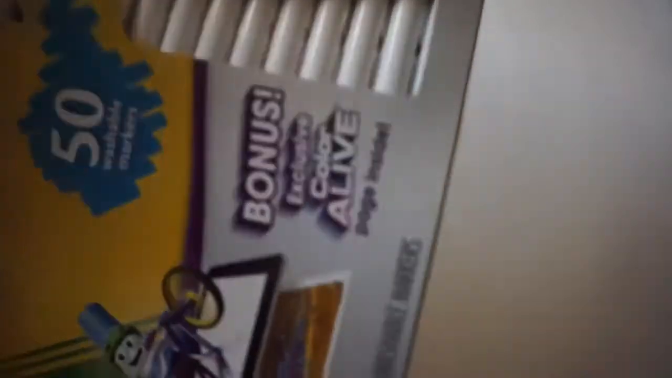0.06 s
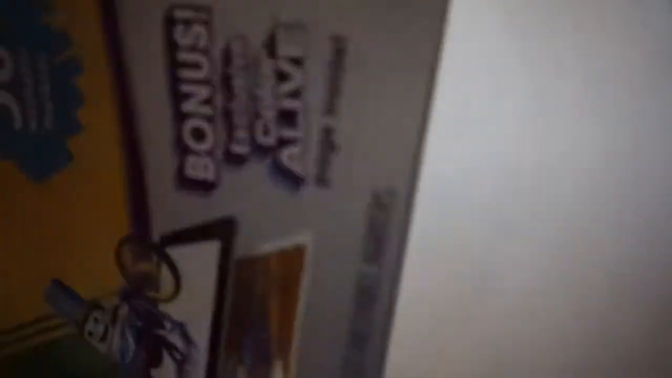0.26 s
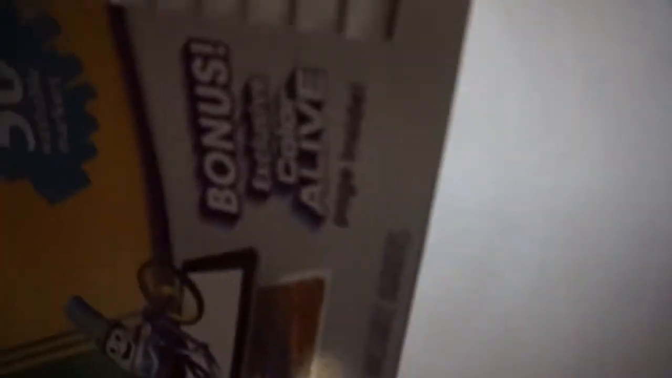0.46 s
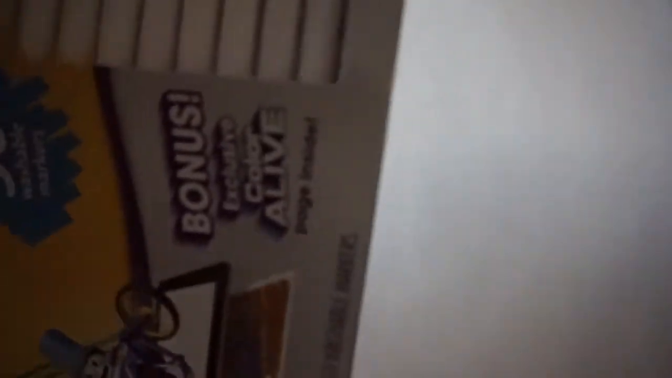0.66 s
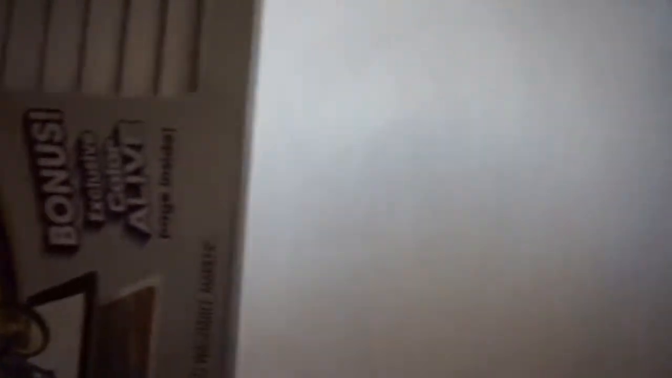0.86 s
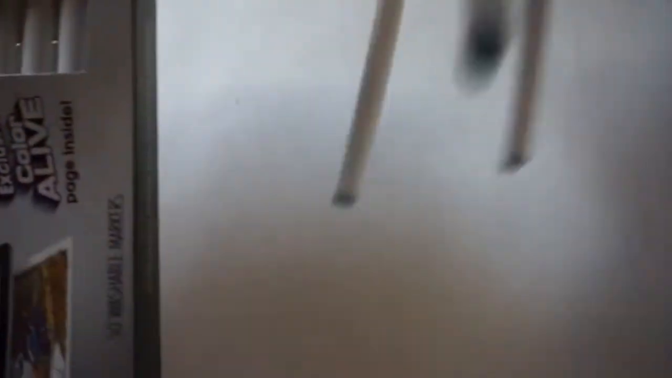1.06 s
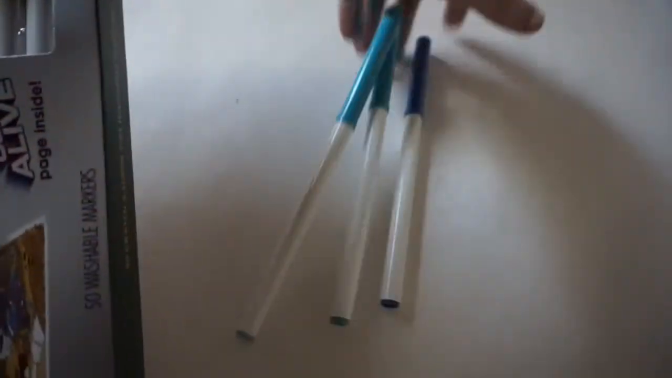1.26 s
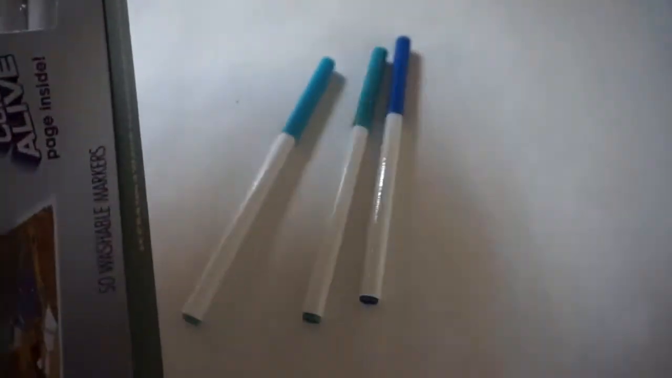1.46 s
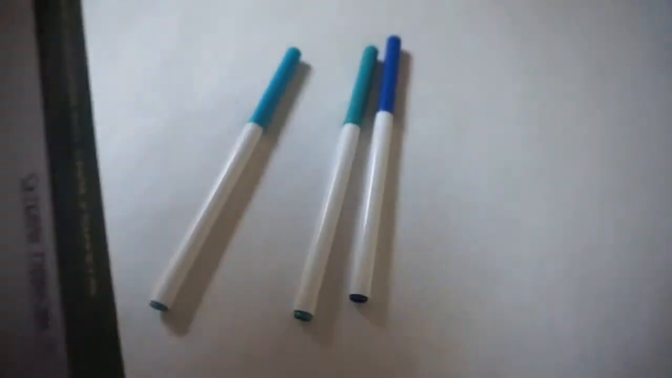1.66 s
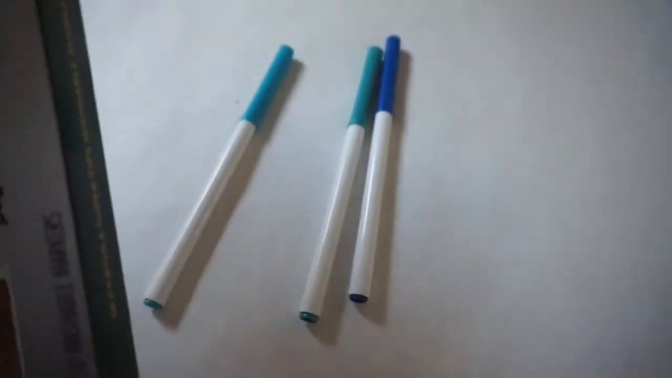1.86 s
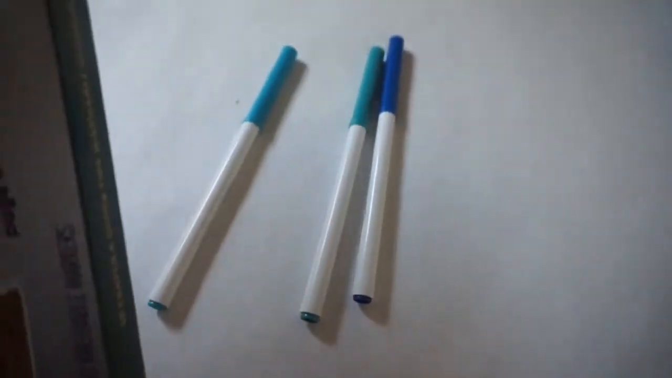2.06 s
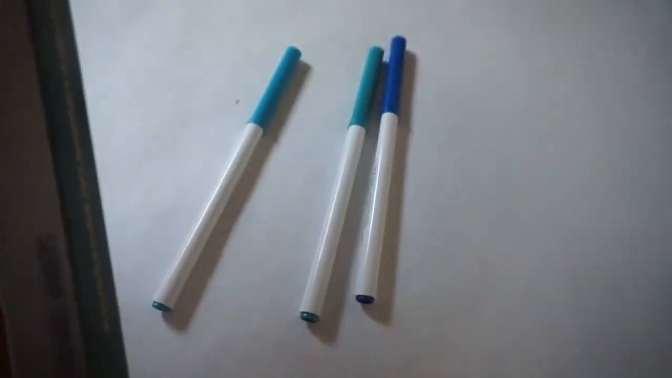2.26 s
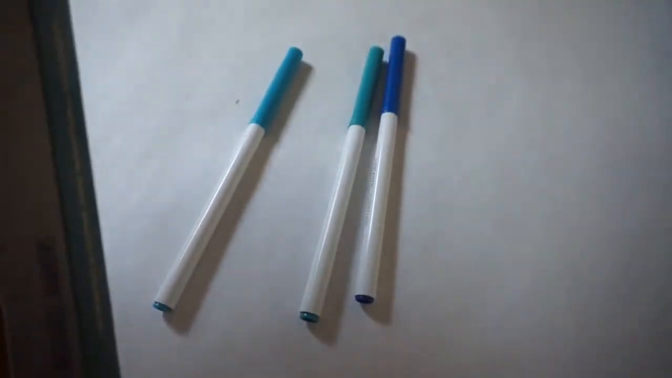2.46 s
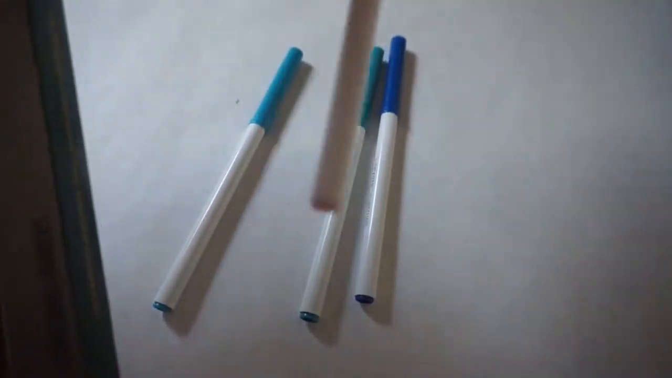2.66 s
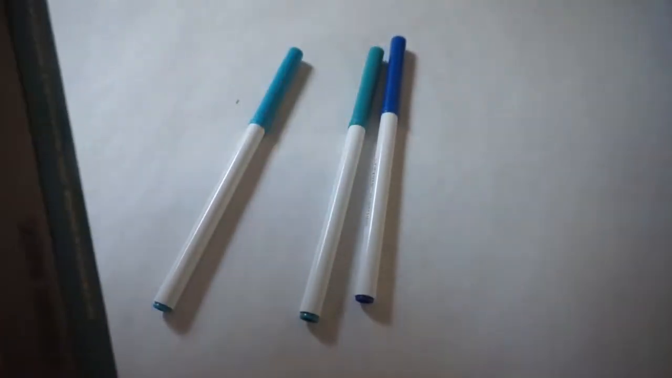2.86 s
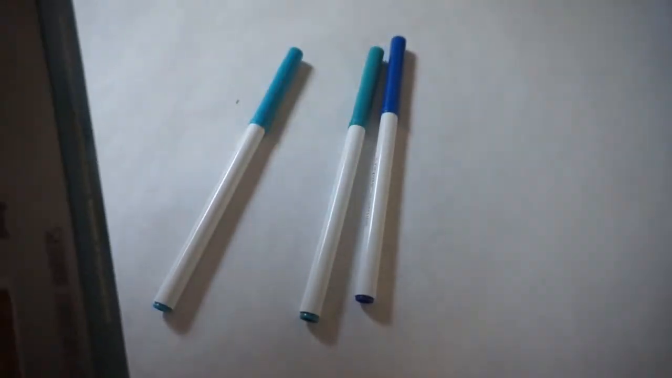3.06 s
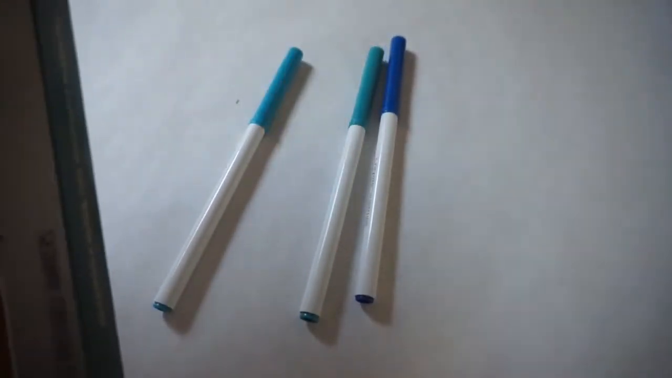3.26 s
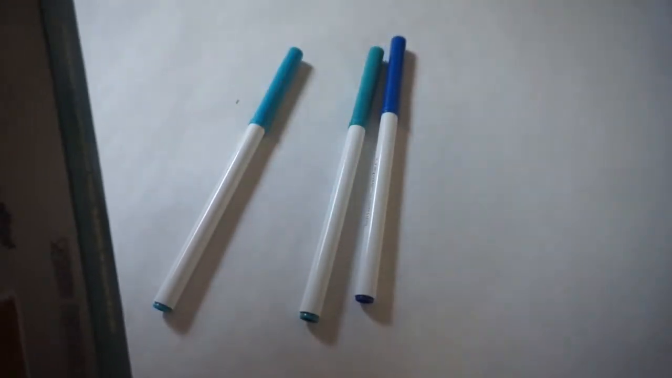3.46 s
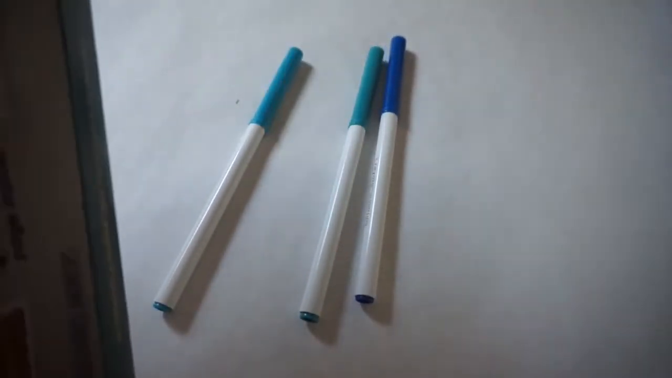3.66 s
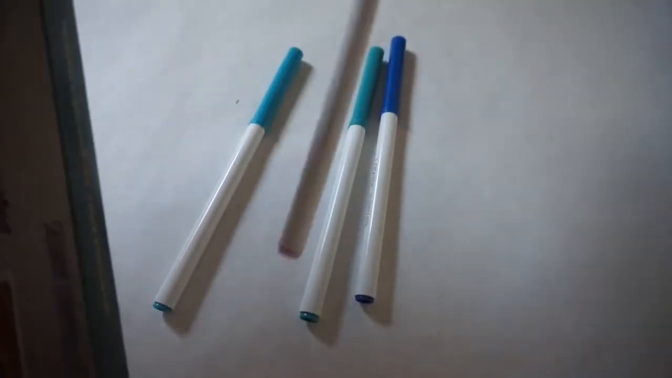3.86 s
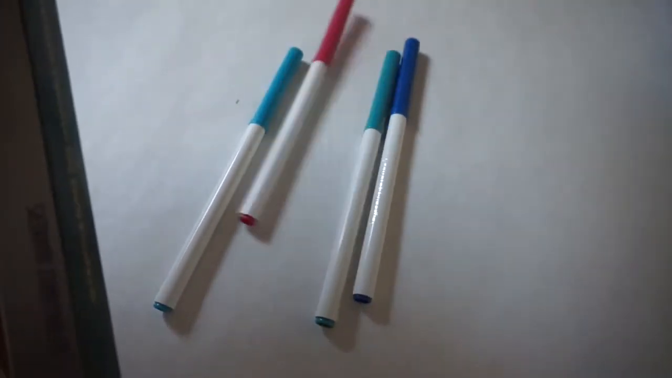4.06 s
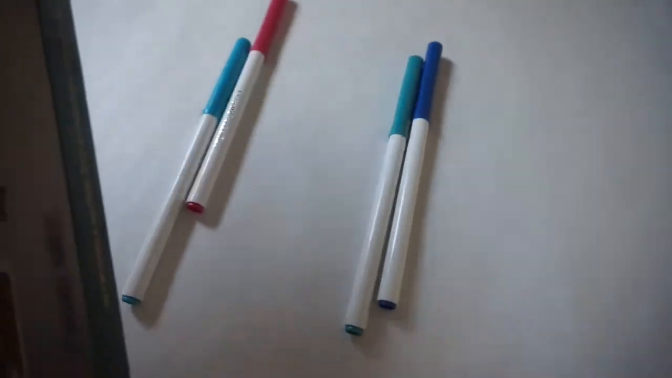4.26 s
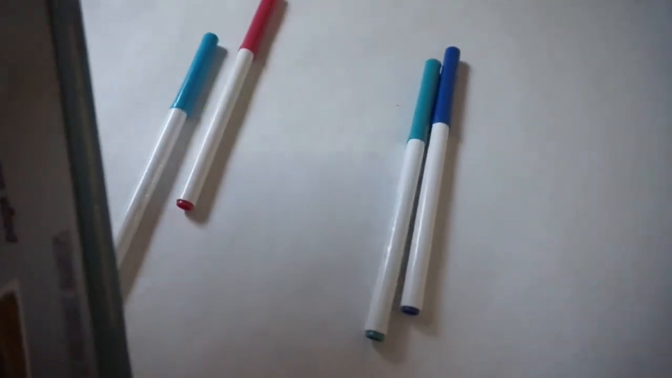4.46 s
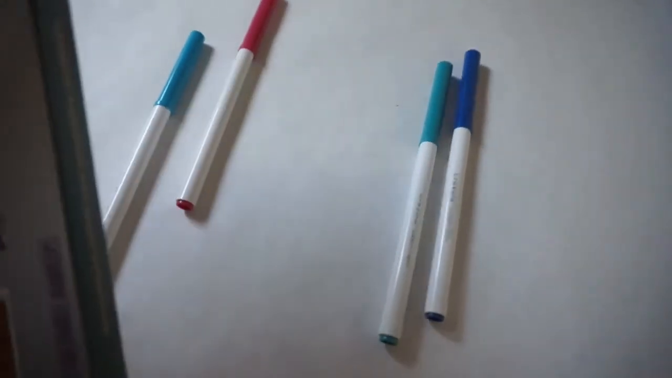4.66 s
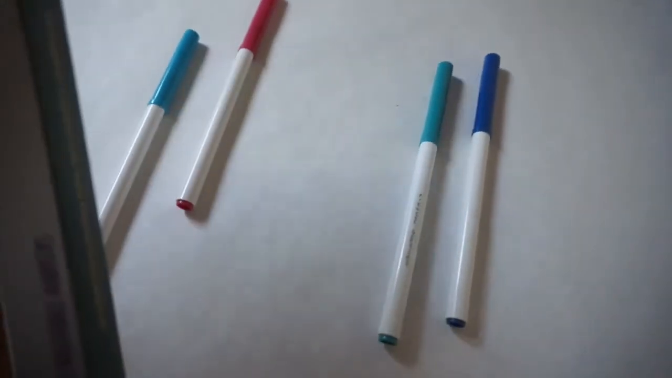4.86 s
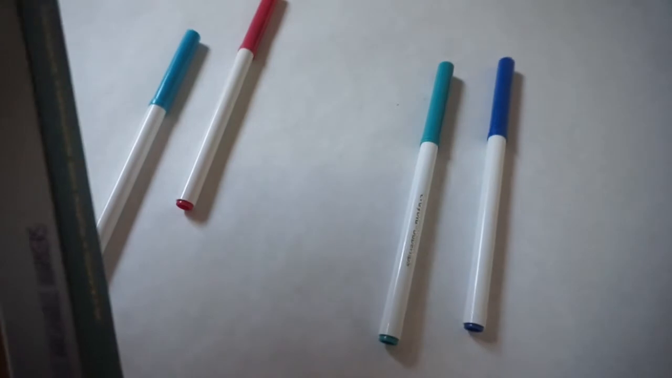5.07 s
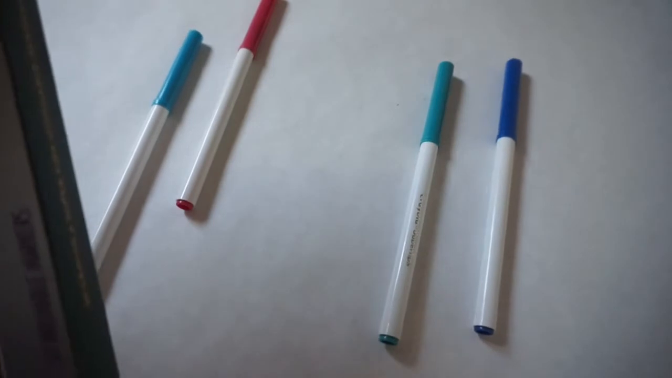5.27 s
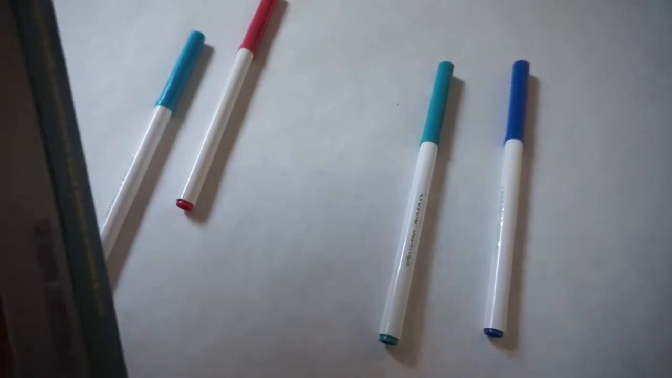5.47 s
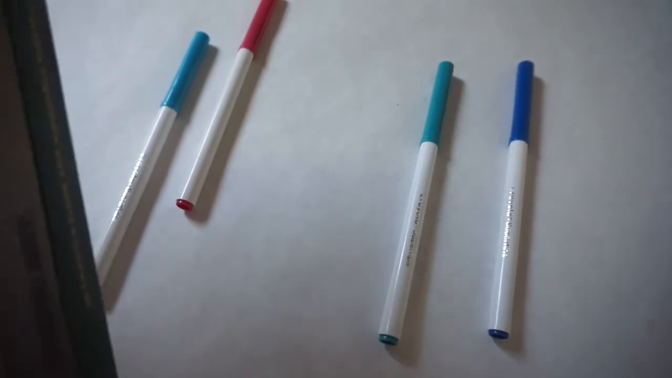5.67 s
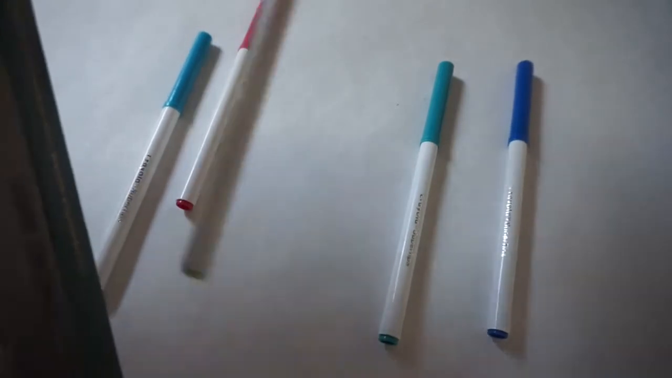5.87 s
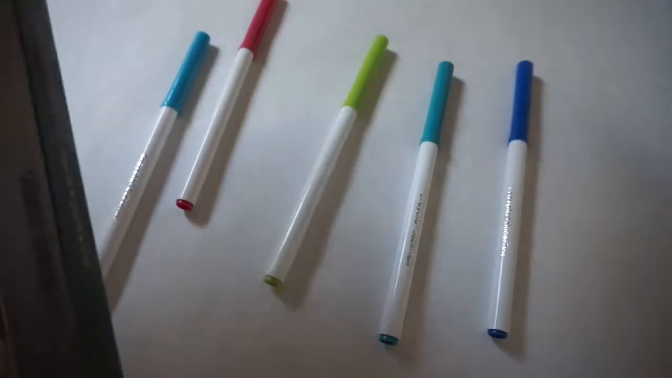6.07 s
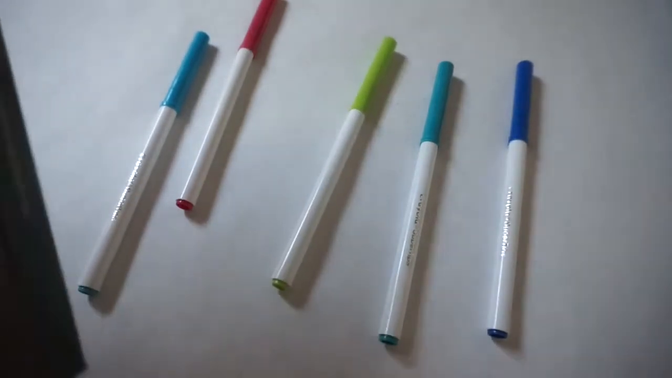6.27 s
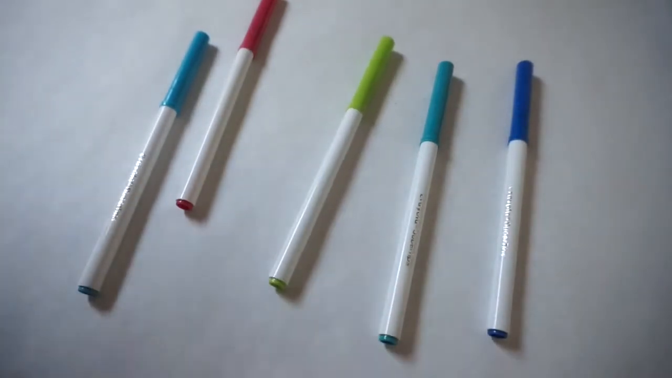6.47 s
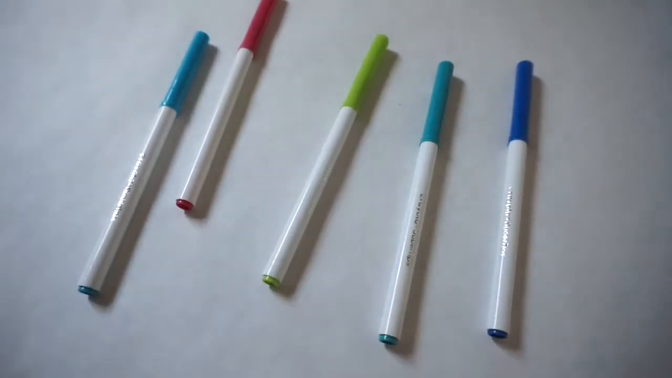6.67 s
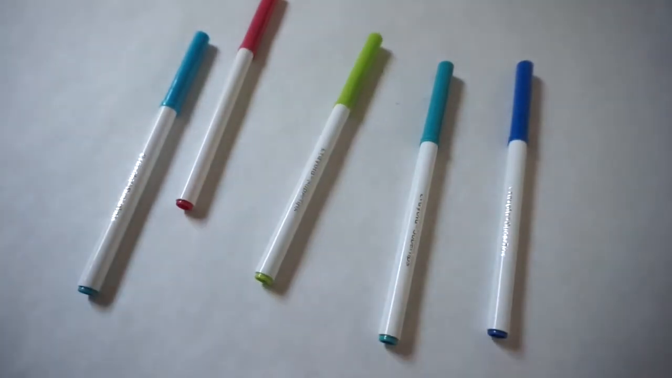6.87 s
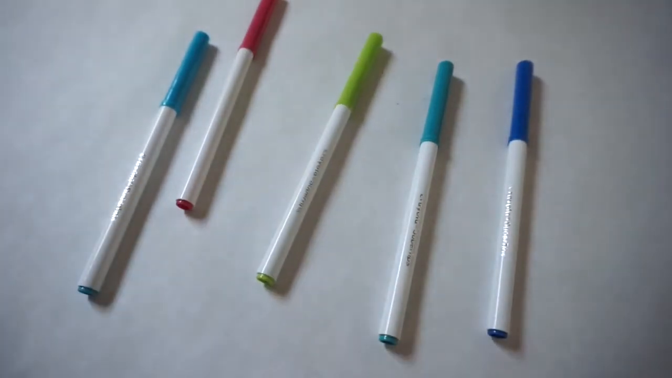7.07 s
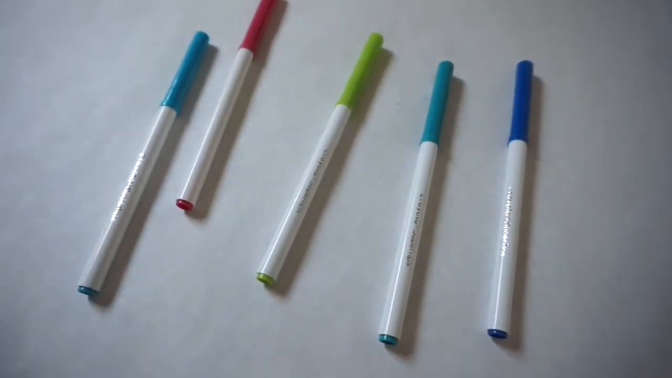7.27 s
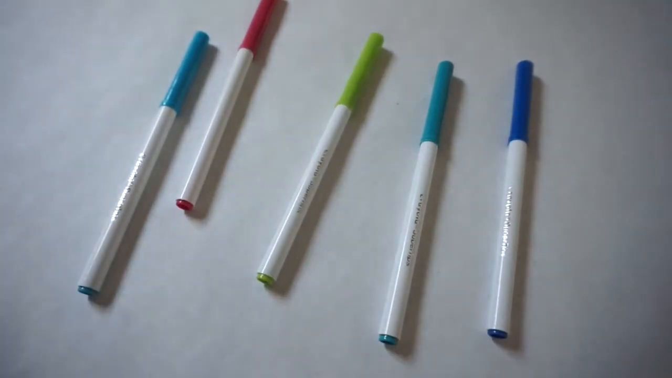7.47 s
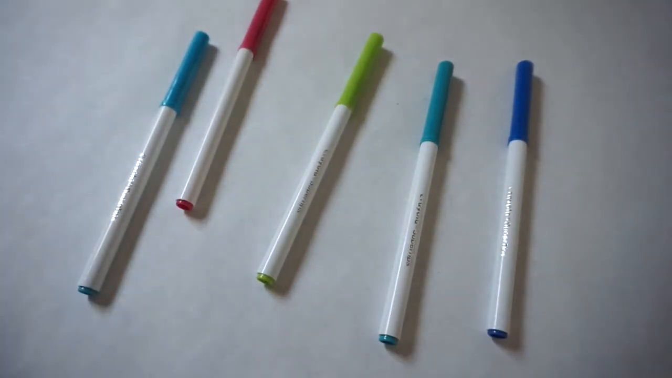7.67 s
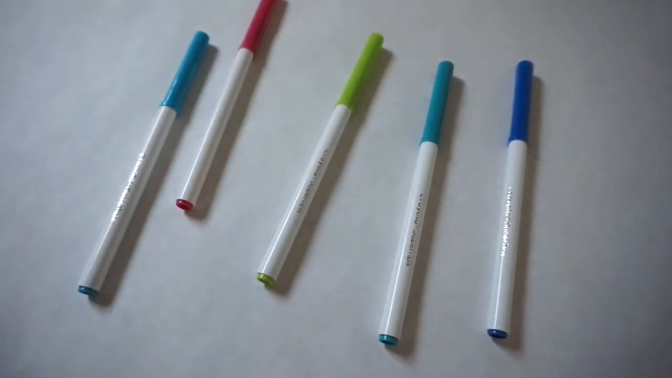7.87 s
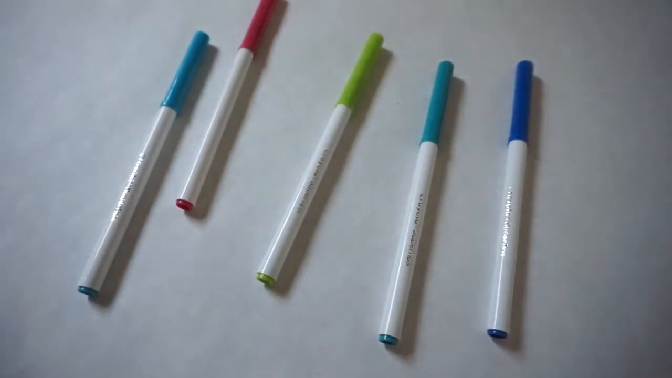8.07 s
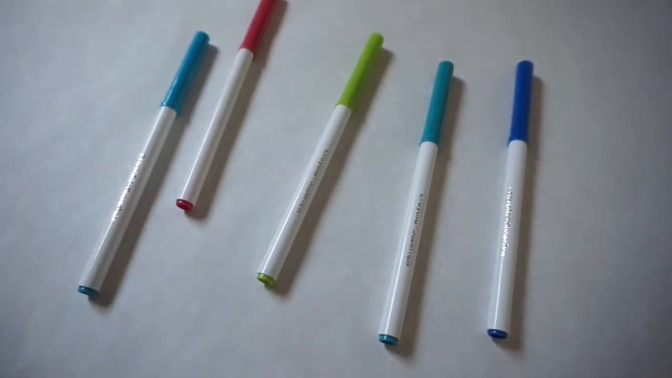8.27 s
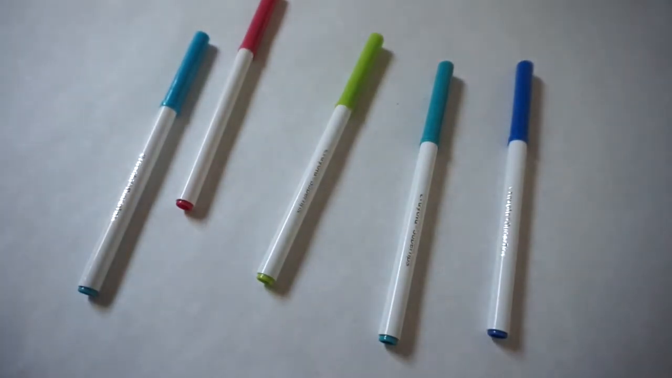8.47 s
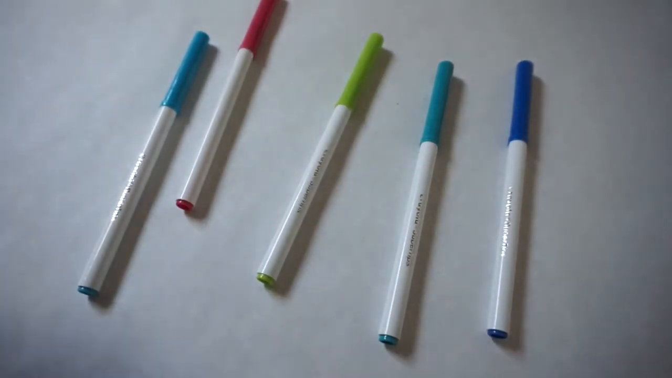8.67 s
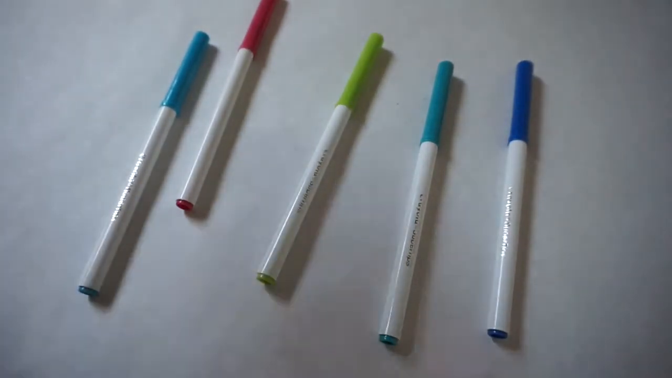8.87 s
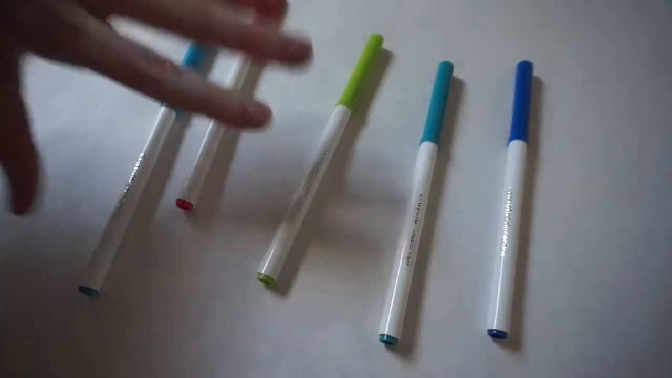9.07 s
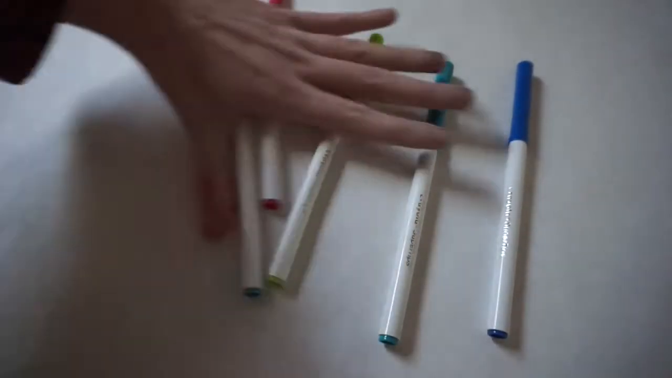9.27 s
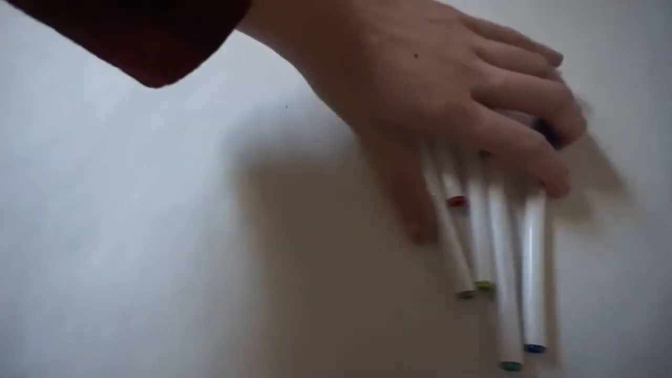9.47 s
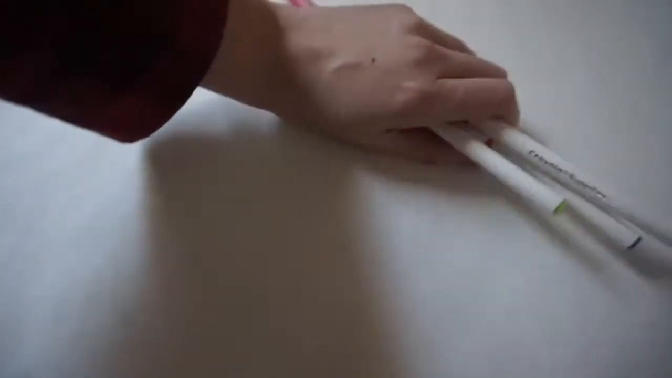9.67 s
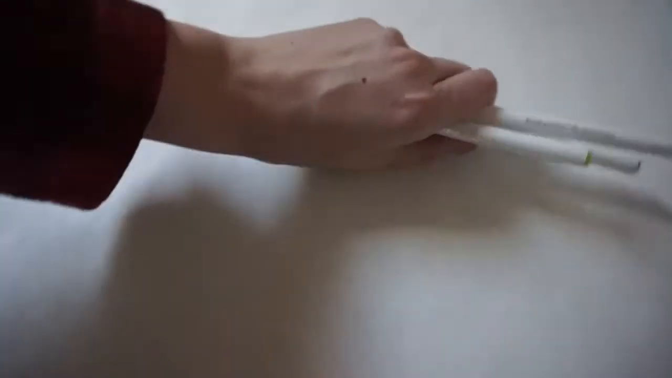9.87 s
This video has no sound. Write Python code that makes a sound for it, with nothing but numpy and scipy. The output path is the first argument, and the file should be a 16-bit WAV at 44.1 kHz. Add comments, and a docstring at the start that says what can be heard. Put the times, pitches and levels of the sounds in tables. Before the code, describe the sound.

Markers rattle and scrape in a cardboard box, a few drop on paper with hollow plastic clicks, then a hand sweeps them up clacking.

```python
"""Felt-tip markers, box and paper

Quiet small room, stereo camera close to a table: felt-tip markers leave a cardboard box and drop on paper.
The box scrapes and knocks to the left (noise friction, ticks, struck resonances); each dropped barrel
slaps and bounces with ringing modes; barrels jostle, roll and clack, and at last a hand sweeps them up.
Behind lie soft air noise, a thin electrical whine and a low hum that comes and goes."""
import sys
import numpy as np
from scipy import signal
from scipy.fft import rfft, irfft, next_fast_len
from scipy.io import wavfile
from scipy.ndimage import map_coordinates

SR = 44100
rng = np.random.default_rng(int(sys.argv[2]) if len(sys.argv) > 2 else 0)


def store_wav(level_fs):
    """Save 16-bit WAV to argv[1]."""
    pcm = np.round(np.clip(np.atleast_2d(level_fs), -1, 1) * 32767)
    wavfile.write(sys.argv[1], SR, pcm.T.astype(np.int16))


N = 437031


def amp(db):
    """Decibels to gain."""
    return 10 ** (np.asarray(db) / 20)


def unit(x):
    """x scaled to rms 1."""
    return x / np.sqrt(np.mean(x ** 2) + 1e-20)


def along(points, hz):
    """(Hz, value) points read on a log frequency axis."""
    f, v = np.transpose(points)
    return np.interp(np.log(hz + 1), np.log(f + 1), v)


def wobble(rate):
    """A smooth random curve through normally distributed knots, rate of them a second."""
    knots = rng.standard_normal(int(N * rate / SR) + 4)
    return map_coordinates(knots, [np.arange(N) * rate / SR])


def filtered(x, response):
    """x filtered by a response of frequency."""
    m = next_fast_len(N + SR // 2)
    hz = np.fft.rfftfreq(m, 1 / SR)
    return irfft(rfft(x, m) * response(hz), m)[:, :N]


def resonance(f, centre_hz, width):
    """A peak of height 1; its half width is a share of its frequency."""
    return 1 / (1 + ((f / centre_hz - 1) / width) ** 2)


def panned(pan_db):
    """Left and right gains for level differences, one per frequency."""
    pair = amp([pan_db / 2, -pan_db / 2])
    return pair / np.sqrt(np.mean(pair ** 2, axis=0))


# the camera body shades its far port: (f/Hz, share of the side level)
SHADOW = [(600, 0), (950, 1), (1700, 1), (2500, .5), (5000, .8), (10000, .2)]


def placed(x, side_db):
    """A source to one side is louder in that port, except in the bass; positive is left."""
    return filtered(x, lambda hz: panned(side_db * along(SHADOW, hz)))


# correlation of the two ports for spread sounds: (f/Hz, left-right likeness)
LIKENESS = [(200, .96), (600, .92), (1100, .65), (2000, .25), (6000, .2), (12000, .45)]


def coloured(pair, colour):
    """Two unrelated signals become left and right, through a causal filter of colour(Hz) dB."""
    n = pair.shape[1]
    m = 2 * next_fast_len(n // 2 + SR // 10)
    hz = np.fft.rfftfreq(m, 1 / SR)
    # folding the cepstrum forward in time gives minimum phase
    cepstrum = irfft(np.log(amp(colour(hz))))[:m // 2]
    cepstrum[1:] *= 2
    response = np.exp(rfft(cepstrum, m))
    turn = np.arccos(np.clip(along(LIKENESS, hz), -1, 1)) / 2
    shares = [np.cos(turn), np.sin(turn)]
    mid, side = irfft(rfft(pair, m) * response * shares)[:, :n]
    return np.array([mid + side, mid - side])


# ringing modes of barrel and table: (f/Hz, relative level/dB before scatter, t60/s)
BARREL_MODES = [(160.4, -7, 0.23), (288, 1.5, 0.09), (685.7, 0, 0.089), (1188, 1.5, 0.16),
                (1660, -5.5, 0.088), (2268, -2.5, 0.16), (3010, -9, 0.11), (6226, -8.5, 0.053)]
# the click inside each contact: (f/Hz, spectral level/dB per Hz)
CLICK = [(1500, -22), (5000, -1.5), (10000, 4.5), (15000, -4)]
CLICK_AFTER_S, CLICK_WIDTH_S = 0.0023, 0.00026  # centre and Gaussian width
OWN_T60_S = 0.073  # ring of the resonance that a blow favours


def contacts(rows, spectrum, crack, rattle, rattle_db, ring_db, own_db, peak_db, linger, thump_db, click_db):
    """A contact is a crack, a dying rattle (t60 s), modes and a click; level is rms over its first 20 ms."""
    t = np.arange(SR // 3) / SR
    out = np.zeros((2, N + SR))
    hz, level, t60 = np.transpose(BARREL_MODES)[:, :, None]
    press = 1 - np.exp(-(t / 0.00061) ** 2)  # the contact builds up in under a millisecond
    for s, db, hard_db, peak_hz in rows:
        snap = unit(rng.standard_normal((2, len(t))) * press * amp(-60 * t / crack))
        buzz = unit(rng.standard_normal((2, len(t))) * press * amp(-60 * t / rattle))

        # hardness lifts the treble; the struck place favours one resonance, and a share lingers in the rattle
        tilt = [(350, thump_db), (700, 0), (2000, 0.0098), (5500, hard_db)]
        shape = lambda f, share=1: along(tilt, f) + share * peak_db * resonance(f, peak_hz, width=0.13)

        scatter_db = 2 * rng.standard_normal(hz.shape)
        strength = amp(level + shape(hz) + scatter_db - 60 * t / t60)
        detune = 1 + rng.normal(0, 0.017, hz.shape)
        ring = unit((strength * press * np.cos(2 * np.pi * hz * t * detune)).sum(0))

        hit = coloured(snap, lambda f: along(spectrum, f) + shape(f))
        # the highest vibrations die first, so the rattle is duller than the crack
        dulling = [(2500, 6.0), (9000, -4.0)]
        hit += coloured(buzz, lambda f: along(spectrum, f) + shape(f, linger) + rattle_db + along(dulling, f))

        # the shell bottoms out a moment later with a tiny bright click
        burst = np.exp(-.5 * ((t - CLICK_AFTER_S) / CLICK_WIDTH_S) ** 2)
        click = rng.standard_normal((2, len(t))) * burst
        click = unit(coloured(click, lambda f: along(CLICK, f)))

        # a blunt blow leaves the favoured resonance ringing more than a sharp one does
        own = unit(press * np.sin(2 * np.pi * peak_hz * t) * amp(-60 * t / OWN_T60_S))

        hit = unit(hit) + amp(ring_db) * ring
        hit += amp(own_db - hard_db / 2) * own
        hit += amp(click_db + hard_db) * click
        out[:, round(s * SR):][:, :len(t)] += amp(db) * hit / hit[:, :SR // 50].std()
    return out[:, :N]


def friction(spectrum, grit, catches):
    """Rms 1: smooth rubbing plus tiny catches of uneven size, so many a second, dying in a few ms."""
    size = rng.exponential(size=N) * (rng.random(N) < catches / SR)
    bursts = signal.lfilter([1], [1, -np.exp(-1 / (0.0011 * SR))], size)
    force = rng.standard_normal((2, N)) * (1 + grit * unit(bursts))
    return unit(coloured(force, lambda hz: along(spectrum, hz)))


GRAIN_LOW_HZ, GRAIN_HIGH_HZ = 550, 1900  # pitch range of the ticks of a moving barrel
GRAIN_CYCLES, GRAIN_SPREAD_DB = 2.5, 4  # decay in cycles; scatter of size


def grains(spectrum, rate):
    """Rms 1: tiny ticks, so many a second, each ringing for a few cycles at its own pitch."""
    when, pitch, size, *phases = rng.random((int(rate * N / SR), 5)).T[:, :, None]
    hz = GRAIN_LOW_HZ * (GRAIN_HIGH_HZ / GRAIN_LOW_HZ) ** pitch
    k = np.arange(SR // 50)
    cycles = hz * k / SR
    strength = np.sqrt(hz) * amp(-GRAIN_SPREAD_DB * np.log(np.maximum(size, 1 / 20)))
    envelope = strength * np.exp(-cycles / GRAIN_CYCLES) * np.minimum(2 * cycles, 1)
    at = ((when * N).astype(int) + k).ravel()
    ticks = [envelope * np.sin(2 * np.pi * (cycles + phase)) for phase in phases]
    pair = np.array([np.bincount(at, tick.ravel(), N)[:N] for tick in ticks])
    return unit(coloured(pair, lambda f: along(spectrum, f)))


RISE_DB = 16.5  # a stroke swells by this much during its attack


def stroke(start, attack, hold, release):
    """Gain of one movement: it swells out of silence, holds and dies away."""
    t = np.arange(N) / SR - start
    rise = np.clip(t / attack, -10, 1) - 1
    fall = np.clip((t - attack - hold) / release, 0, 2)
    return amp(RISE_DB * rise - 60 * fall)


def strokes(rows):
    """One gain curve for the main layer and one for each layer that the same movements drive."""
    return sum(np.outer(amp(db + np.array([0, *others])), stroke(start, attack, hold, release))
               for start, attack, hold, release, db, *others in rows)


# strokes of markers along the box:
# (start t/s, attack/s, hold/s, release t60/s, cardboard level/dB, hiss over it/dB, table over it/dB)
SLIDES = [(0, 0.016, 0.018, 0.34, -41, -3.5, -22), (.14, 0.068, 0.029, 0.61, -32, -1.5, -19.5),
          (.44, 0.022, .06, 0.13, -39, -5.5, -19), (1.56, 0.011, 0.072, 0.49, -43, -8.5, -13.5),
          (2.03, 0.034, 0.1, 0.41, -56, 8, -30), (2.22, 0.036, 0.044, 0.23, -46.5, -9, -8),
          (3.27, 0.0038, 0.0085, 0.367, -57, -1.5, -5), (3.44, 0.033, 0.022, .35, -51, 4.5, -24),
          (3.49, 0.042, 0.022, .12, -40, -8.5, -28.5), (5.31, 0.024, .14, 0.22, -52, 6, -9),
          (6.36, 0.017, 0.18, 0.18, -39, -9, -15), (6.52, 0.033, .06, 0.3, -30.5, -19.5, -12.5),
          (6.69, .02, 0.033, 0.59, -35, -8, -9.5), (6.94, 0.026, 0.1, 1, -51, -4.5, 3.5),
          (7.503, 0.019, 0.014, 0.4, -39, -9, -5.5), (7.62, .018, 0.045, 0.35, -27.5, -9, -10.5),
          (8.6, 0.01, .07, 0.24, -44, -12, -0.5)]
# colours of cardboard scrape, its hiss and the table's drone: (f/Hz, spectral level/dB per Hz)
CARDBOARD = [(200, -28.5), (400, -12.5), (540, -2), (800, -1.5), (1150, 2), (2700, 0), (3500, -12),
             (4700, -15), (7000, -22.5)]
HISS = [(1500, -45), (3200, 0.5), (11000, -6), (15500, -9.5)]
TABLE = [(30, -30), (100, -16), (170, 2), (230, -13), (295, -2), (380, -12), (560, -1.5), (900, -11.5),
         (2000, -55)]
GRAIN_SHARE = .3  # the ticks' share of the power of a scrape


def slides():
    """Barrels stick and slip along the box with low, woody ticks; the box drones through the table."""
    card, hiss, table = strokes(SLIDES)
    slip = amp(2.2 * wobble(70))
    rub = friction(CARDBOARD, grit=0.29, catches=150)
    ticks = grains(CARDBOARD, rate=300)
    scrape = np.sqrt(1 - GRAIN_SHARE) * rub + np.sqrt(GRAIN_SHARE) * ticks
    crackle = friction(HISS, grit=0.46, catches=140)
    drone = table * friction(TABLE, grit=0.25, catches=100)
    return slip * (card * scrape + hiss * crackle) + drone


# colour of the room air: (f/Hz, spectral level/dB per Hz)
AIR = [(25, -8.5), (165, -1), (230, -5.5), (295, -3), (400, -8), (850, -12), (1250, -8.5), (1800, -17),
       (15000, -27)]
# level of the air: (t/s, level/dB)
AIR_LEVEL = [(0.9, -71.5), (2, -67), (3.2, -71.5), (3.8, -66.5), (8.4, -67)]
# the low hum comes and goes: (t/s, level/dB before its wobble)
HUM_LEVEL = [(7.55, -90), (7.7, -63), (8.36, -64.5), (8.58, -86.5), (8.7, -64.5), (9.9, -64)]
WHINE_HZ = 15735


def background():
    """Room air is coloured noise; the electrical whine is a steady sine, the hum a wavering one."""
    t = np.arange(N) / SR
    level = lambda rows: amp(np.interp(t, *np.transpose(rows)))
    air = unit(coloured(rng.standard_normal((2, N)), lambda hz: along(AIR, hz)))
    whine = amp(-76.5) * np.sin(2 * np.pi * WHINE_HZ * t)
    hum_swell = amp(2.5 * wobble(10))
    hum = level(HUM_LEVEL) * hum_swell * np.sin(2 * np.pi * 55.4 * t + .6 * wobble(8))
    return level(AIR_LEVEL) * air + whine + hum


# markers knocking in and against their box: (t/s, level/dB, hardness/dB, resonance f/Hz)
KNOCKS = [(0.041, -36, 6.5, 1410), (0.207, -28.5, 6.5, 1430), (0.235, -27.5, 1.5, 2290),
          (0.245, -32, 1.5, 3240), (0.3, -29.5, 2, 940), (0.313, -30.5, 10, 2670),
          (0.336, -28.5, 0.5, 2740), (0.399, -39.5, 8.5, 2800), (0.431, -21.5, -2.5, 2350),
          (0.4365, -28.5, 8, 2080), (0.444, -30, 5, 1720), (0.467, -28, -1.5, 1940), (0.4935, -24, -6, 754),
          (0.517, -33.5, -3, 1905), (0.5525, -20.5, -5, 2440), (0.5605, -27.5, -3, 3510),
          (0.626, -43.5, 8.5, 3400), (0.762, -65, 12.5, 4980), (1.574, -42.5, 2, 2850),
          (1.615, -37.5, 0, 715), (1.679, -33, -16, 1300), (2.197, -34.5, -5, 1320), (2.263, -36, -3, 1440),
          (2.276, -37.5, 10, 574), (2.323, -40.5, 2, 3080), (3.346, -53, -18.5, 1700),
          (3.493, -43, -2.5, 1970), (3.52, -29.5, 0, 1380), (3.5765, -43, -11.5, 1030),
          (3.588, -27.5, -5, 1750), (4.324, -57, -2, 600), (4.41, -54, 3, 1310), (5.182, -44.5, -8.5, 873),
          (5.207, -44, -16, 1660), (5.305, -35.5, -5, 1290), (5.475, -33.5, -1, 2530),
          (5.896, -35, 9.5, 1250), (6.346, -35.5, -10.5, 1130), (6.379, -31.5, -8, 1420),
          (6.453, -27.5, -9, 1650), (6.528, -23, 2, 870), (6.7, -30.5, 6, 1270), (6.797, -37.5, 12, 2350),
          (6.971, -38, -16, 1200), (7.031, -37, -15, 550), (7.07, -42, -10.5, 625),
          (7.183, -48, 16.5, 1390), (7.726, -29.5, -2.5, 1400), (7.778, -37.5, -8, 2690)]
# colour of a knock on the box: (f/Hz, spectral level/dB per Hz)
BOX = [(40, -18), (400, -9.5), (700, -1.5), (2500, -2), (4000, -5.5), (7000, -11.5), (15000, -16)]


def knocks():
    """Markers bump each other and the dead cardboard, with short cracks and little ringing."""
    return contacts(KNOCKS, BOX, crack=0.014, rattle=0.055, rattle_db=-1.0, ring_db=-25, own_db=-32,
                    peak_db=16, linger=0.21, thump_db=-4.0, click_db=-22.0)


# short hard shoves against the cardboard: (t/s, rms level at the peak/dB, Gaussian width/s, resonance f/Hz)
SHOVES = [(0.487, -30, 0.017, 749.5), (3.548, -25, 0.0071, 3100), (5.457, -32, 0.012, 982),
          (6.597, -20.5, .018, 1080), (7.66, -21.5, 0.014, 2100), (7.815, -42.5, 0.035, 1810)]


def shoves():
    """A hard push makes dense slips, and one resonance of the box stands out."""
    out = np.zeros((2, N))
    t = np.arange(SR // 5) / SR - 1 / 10
    for s, db, width, peak_hz in SHOVES:
        rub = lambda f: np.maximum(along(CARDBOARD, f), along(HISS, f) - 17)
        colour = lambda f: rub(f) + 8 * resonance(f, peak_hz, width=0.1)
        scrape = unit(coloured(rng.standard_normal((2, len(t))), colour))
        push = amp(db) * np.exp(-.5 * (t / width) ** 2)
        out[:, round((s + t[0]) * SR):][:, :len(t)] += push * scrape
    return out


# the box bumping the table: (t/s, level/dB)
BUMPS = [(0.555, -40), (1.615, -47), (5.894, -49.5), (6.453, -46), (7.027, -41.5), (7.155, -50.5),
         (7.251, -57), (9.035, -50.5)]
# colour of the thud: (f/Hz, spectral level/dB per Hz)
BUMP = [(30, -20), (70, -5.5), (170, -5.5), (300, -3), (500, -4.5), (1200, -38)]
BUMP_ATTACK_S, BUMP_T60_S = 0.0051, 0.072


def bumps():
    """The box thuds softly on the table: short bursts of low noise."""
    level = sum(amp(db) * stroke(s, BUMP_ATTACK_S, 0, BUMP_T60_S) for s, db in BUMPS)
    return level * unit(coloured(rng.standard_normal((2, N)), lambda hz: along(BUMP, hz)))


# markers dropped on the paper: (t/s, landing level/dB, far end follows after/s, flight of a bounce/s,
# first bounce level/dB, second bounce level/dB, resonance on landing f/Hz, resonance on bouncing f/Hz)
DROPS = [(1.231, -35, .0227, 0.074, -27, -33, 699, 1194),
         (1.3006, -28.5, .0296, 0.081, -27, -29, 2242, 1948),
         (4.0607, -30.5, .0205, .0934, -27, -58, 2294, 3032),
         (6.0313, -27, .0268, 0.1, -32, -72, 2410, 1186)]
# colour of plastic on paper: (f/Hz, spectral level/dB per Hz)
PLASTIC = [(45, -48), (100, -13), (170, -6.5), (2200, 0), (4500, -1), (8000, -5), (15000, -13.5)]
SLAP_DB, SLAP_HARD_DB = 1, -3.5  # the far end: level against the landing, hardness
CHATTER_S, CHATTER_DB, CHATTER_HARD_DB = 0.0071, -3, 10.5  # after the slap; level against the landing
BOUNCE_HARD_DB, SOFTEN_DB = 0, 5  # hardness of the first bounce; the second is softer


def drops():
    """A hollow barrel lands on one end, slaps down the other, chatters and bounces twice; the table rings."""
    rows = []
    for s, db, follow, flight, first_db, second_db, landing_hz, bounce_hz in DROPS:
        slap_s = s + follow
        rows += [(s, db, 0, landing_hz),
                 (slap_s, db + SLAP_DB, SLAP_HARD_DB, landing_hz),
                 (slap_s + CHATTER_S, db + CHATTER_DB, CHATTER_HARD_DB, landing_hz),
                 (s + flight, first_db, BOUNCE_HARD_DB, bounce_hz),
                 (s + 2 * flight, second_db, BOUNCE_HARD_DB - SOFTEN_DB, bounce_hz)]
    hits = contacts(rows, PLASTIC, crack=0.012, rattle=0.069, rattle_db=-1.5, ring_db=-7.0, own_db=-14,
                    peak_db=0.0, linger=0.94, thump_db=-2.5, click_db=-13.5)
    return placed(hits, side_db=-2.0)


# barrels jostling along the box: (start t/s, level/dB, t60/s)
JOSTLES = [(1.7, -52, 0.99), (5.15, -51, 1.1)]


def jostling():
    """A marker keeps nudging the box with sparse ticks that die away."""
    t = np.arange(N) / SR
    level = sum(amp(db - 60 * np.abs(t - s) / t60) * (t > s) for s, db, t60 in JOSTLES)
    return level * grains(BOX, rate=120)


# barrels clacking against each other: (t/s, level/dB, hardness/dB, resonance f/Hz)
CLACKS = [(4.1175, -36.5, -5.5, 2260), (4.257, -54, 19, 2920), (7.999, -62.5, -26, 2620),
          (9.2932, -30.5, -14, 2740), (9.354, -30, 4.5, 7330), (9.384, -28.5, 4.5, 2930),
          (9.4324, -34.5, -1.5, 3938), (9.4598, -30.5, -2.5, 7390), (9.5443, -28, -3.5, 2014),
          (9.5848, -29.5, 2, 3480), (9.616, -26.5, -8, 3350), (9.6661, -29, 2.5, 5670),
          (9.707, -36, -11, 3300), (9.7154, -30.5, -6, 1930), (9.7532, -36, -0.5, 2176)]
# colour of a clack: (f/Hz, spectral level/dB per Hz)
CLACK = [(50, -26.5), (170, -10.5), (900, -13.5), (1800, -6), (2900, 1.5), (5000, 4.5), (8000, 0),
         (15000, -9.5)]


def clacks():
    """Barrel meets barrel with a short clack, each at its own pitch."""
    return contacts(CLACKS, CLACK, crack=0.006, rattle=0.075, rattle_db=-1.5, ring_db=-21, own_db=-14,
                    peak_db=7, linger=1.0, thump_db=0.5, click_db=-17)


# barrels rolling over the paper: (start t/s, attack/s, hold/s, release t60/s, level/dB)
ROLLS = [(4.84, .03, .42, .3, -75)]
# the thin squeal of a rolling barrel: resonances, f/Hz
ROLL_HZ = (8970, 11600)
# colour of rubbed paper: (f/Hz, spectral level/dB per Hz)
PAPER = [(200, -27.5), (950, -5), (2900, -0.5), (4500, -4.5), (10000, -3.5), (15500, -7)]


def rolling():
    """Barrels roll over the paper with a thin, resonant whisper that flutters as they turn."""
    level, = strokes(ROLLS)
    squeal = lambda f: along(PAPER, f) + 13 * sum(resonance(f, hz, width=0.039) for hz in ROLL_HZ)
    whisper = coloured(rng.standard_normal((2, N)), squeal)
    flutter = amp(2.8 * wobble(35))
    return level * unit(flutter * whisper)


SQUEAK_RISE_PER_S = 0.35  # share of its pitch


def squeak(s, width, pitch_hz, db):
    """For a moment a barrel sticks and slips at a nearly regular, slowly rising rate."""
    t = np.arange(N) / SR - s
    glide = 1 + SQUEAK_RISE_PER_S * np.clip(t, -3 * width, 3 * width)
    jitter = 1 + .025 * wobble(900)
    phase = 2 * np.pi * np.cumsum(pitch_hz * glide * jitter) / SR
    harmonics = sum(np.sin(k * phase) / np.sqrt(k) for k in np.arange(4) + 1)
    tone = harmonics * amp(3 * wobble(500))
    return amp(db) * np.exp(-.5 * (t / width) ** 2) * tone


# the hand over the paper: (start t/s, attack/s, hold/s, release t60/s, hiss level/dB, table over it/dB)
SWEEPS = [(8.7, 0.046, 0.078, 1, -62, 1.5), (9.265, 0.064, 0.21, 0.26, -38, -11.5),
          (9.54, .04, 0.069, 0.18, -33, -9), (9.7, .02, 0.028, 0.25, -41.5, -14),
          (9.84, 0.023, .04, .3, -56, 3)]


def sweep():
    """A hand drags the markers over the paper: gritty hiss, with a drone from the table."""
    hiss, table = strokes(SWEEPS)
    rub = hiss * friction(PAPER, grit=0.36, catches=230)
    drone = table * friction(TABLE, grit=0.3, catches=110)
    return rub + drone


# panels of the box: (f/Hz, width/Hz, level/dB)
PANELS = [(696, 11, -2), (824, 10, -5.5), (982, 15, -5), (1116, 5.1, -10), (1800, 50, -10), (2950, 18, -10)]


def panels(x):
    """The cardboard panels ring briefly with whatever moves inside."""
    ring = lambda f: sum(amp(db) * 1j * f * w / (hz * hz - f * f + 1j * f * w) for hz, w, db in PANELS)
    return filtered(x, lambda f: 1 + ring(f))


# decay of the small room: (f/Hz, t60/s)
ROOM = [(150, 0.62), (700, 0.16), (2000, .24), (14000, 0.092)]


def room(x):
    """The walls answer with a noise tail; each frequency dies at its own speed."""
    hz, t, z = signal.stft(rng.standard_normal((2, SR // 2)), SR, nperseg=256)
    decay = amp(-60 * t / along(ROOM, hz)[:, None])
    tail = signal.istft(z * decay, SR, nperseg=256)[1]
    tail = coloured(tail, lambda f: along([(300, 0.0), (2000, 4), (10000, -1.5)], f))
    # the tail starts a 150th of a second behind the direct sound
    late = np.pad(tail / np.linalg.norm(tail[0]), ((0, 0), (SR // 150, 0)))
    return signal.fftconvolve(x, late, axes=1)[:, :N]


# where the box is handled: (t/s, side from 0 centre to 1 left)
BOX_SIDE = [(0, 0.35), (1.5, 0.92), (6.6, 0.72), (7.4, 0.12)]
LEAD_S = .00002  # at full left, the left port hears the box this much earlier


def scene():
    """All the handling, its room and the background."""
    paper = drops() + jostling() + rolling() + bumps()
    paper = paper + placed(sweep() + clacks(), side_db=-5)

    box = panels(knocks() + slides() + shoves())
    box = box + squeak(s=5.35, width=0.014, pitch_hz=2400, db=-38.5)
    left = placed(box, side_db=9)
    left = filtered(left, lambda hz: np.exp(1j * np.pi * LEAD_S * np.array([hz, -hz])))
    side = np.interp(np.arange(N) / SR, *np.transpose(BOX_SIDE))
    box = box + side * (left - box)

    echo = room(amp(-11.5) * paper + amp(-16.5) * box)
    return paper + box + echo + background()


# the right port of the camera is brighter: (f/Hz, left-right level/dB)
PORTS = [(8000, -0.5), (12000, -1.5), (15500, -6)]
TOP_HZ = 16000


def record(dry):
    """The camera's two ports, its rumble filter and its band limit."""
    rumble_cut = lambda hz: hz / np.hypot(hz, 45)
    return filtered(dry, lambda hz: panned(along(PORTS, hz)) * rumble_cut(hz) * (hz < TOP_HZ))


dry = scene()
out = record(dry)
store_wav(out)
```